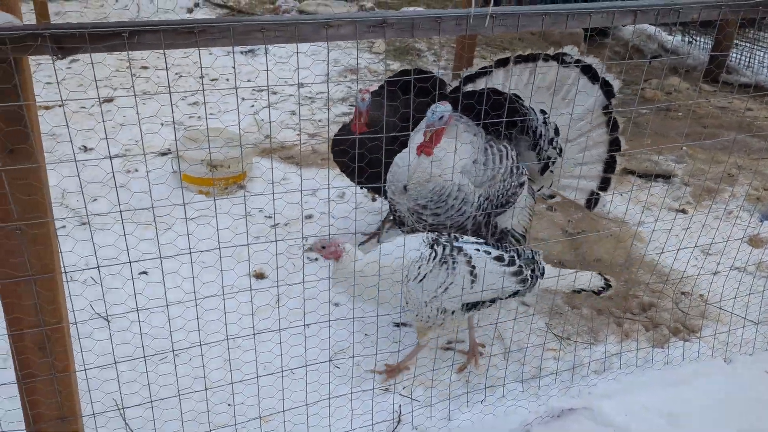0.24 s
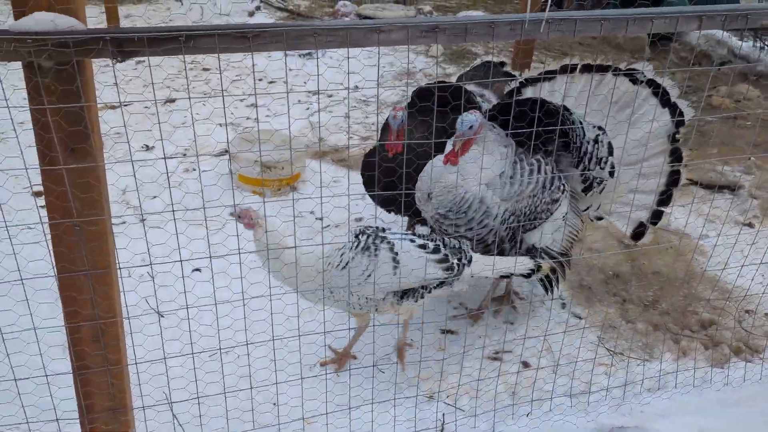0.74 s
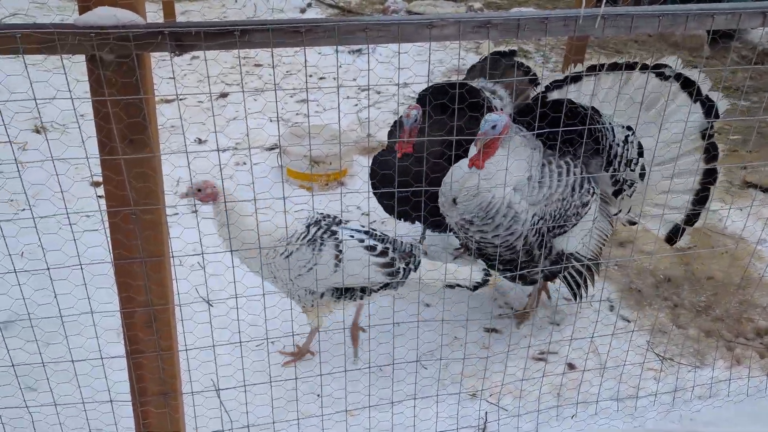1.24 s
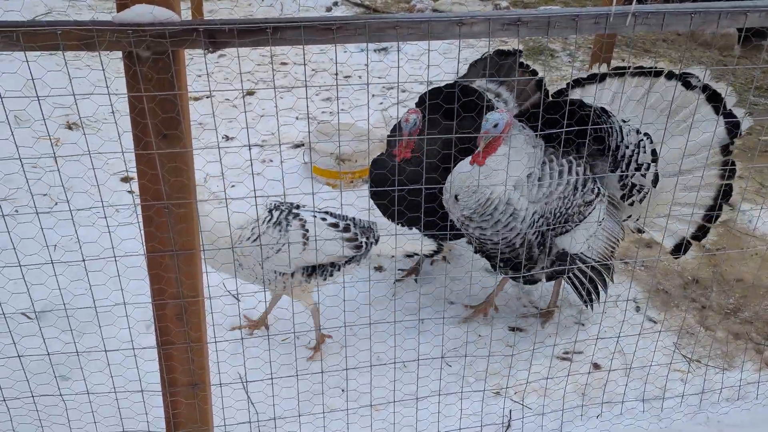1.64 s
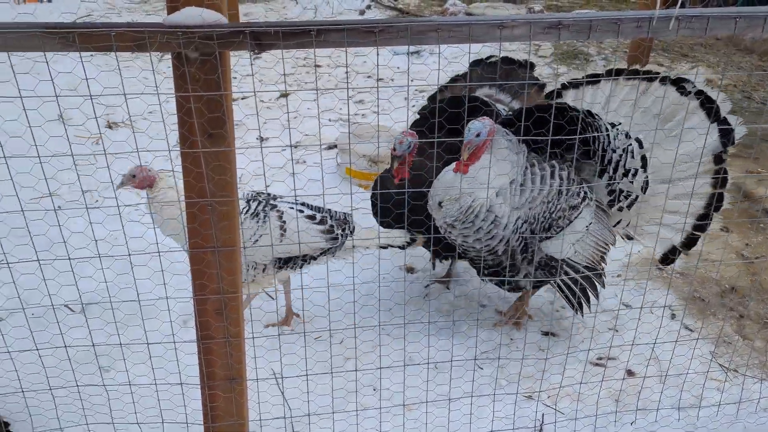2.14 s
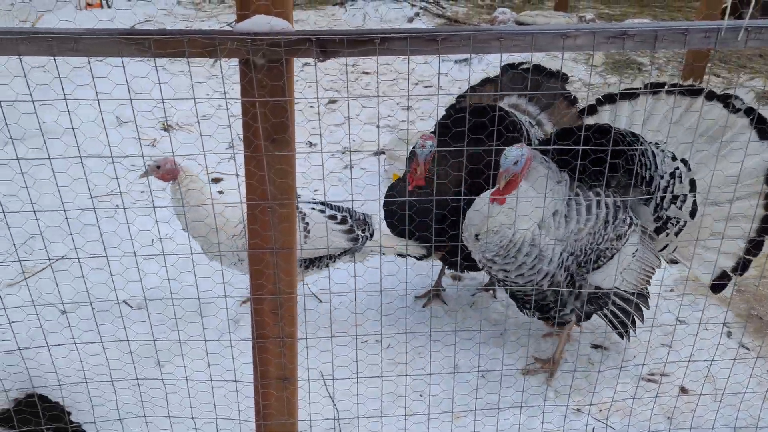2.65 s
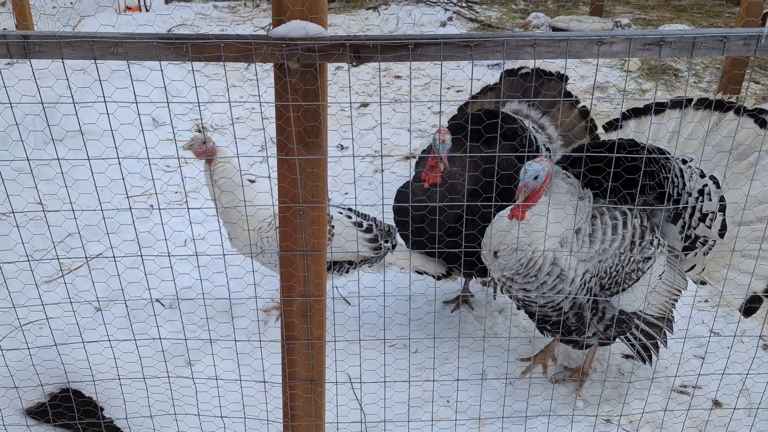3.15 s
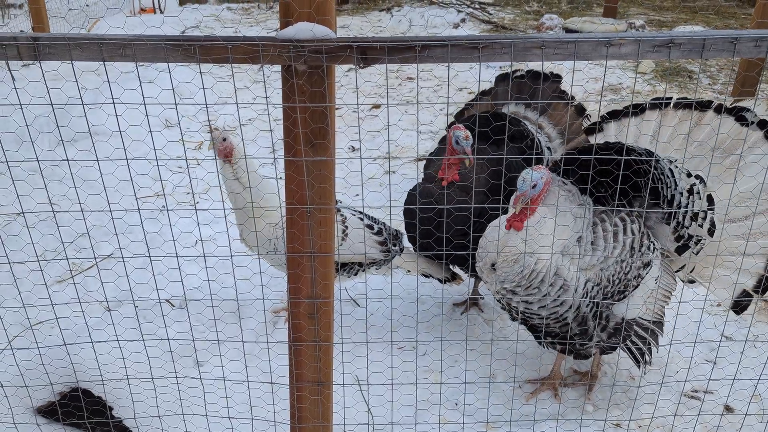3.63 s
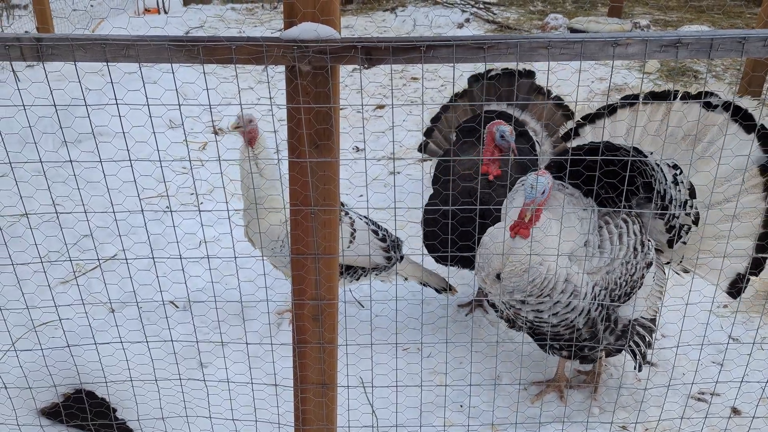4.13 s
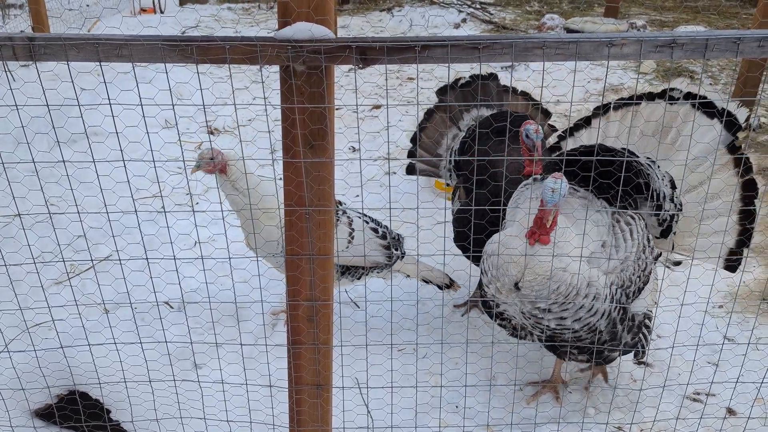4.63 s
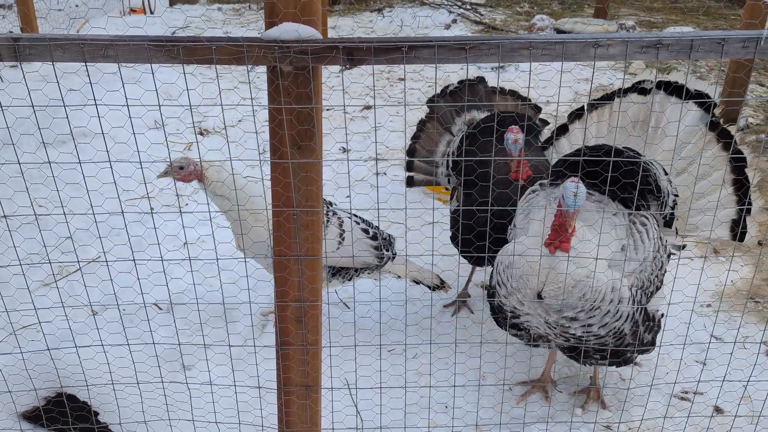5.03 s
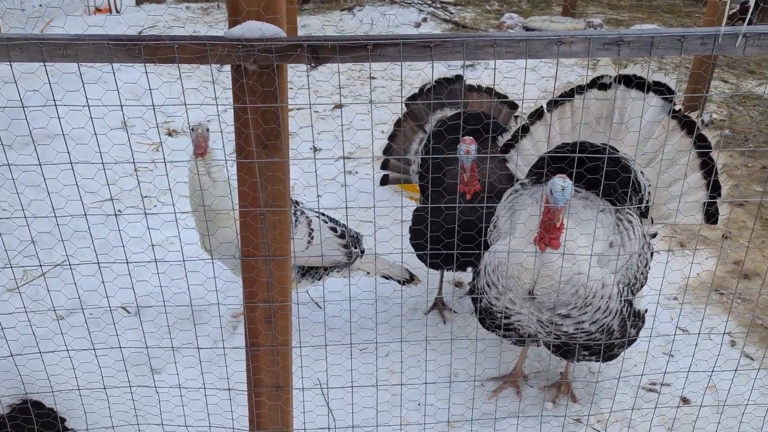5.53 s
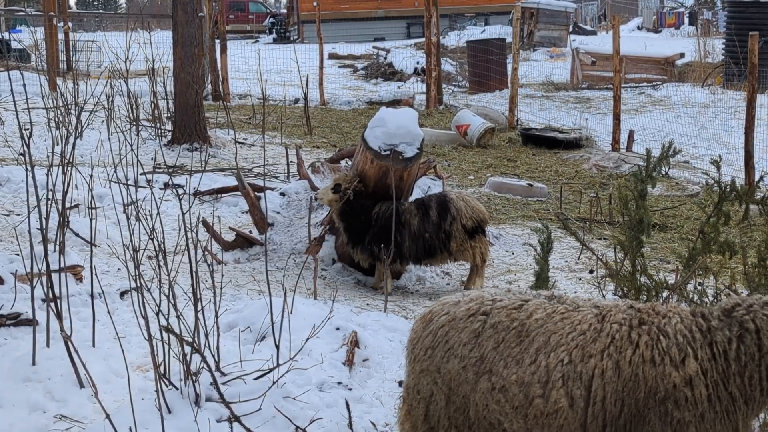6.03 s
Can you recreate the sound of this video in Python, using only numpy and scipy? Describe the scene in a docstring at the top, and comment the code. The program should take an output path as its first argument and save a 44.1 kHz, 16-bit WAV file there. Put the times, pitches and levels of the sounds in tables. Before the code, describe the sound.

Two male turkeys call nearby outdoors: the one ahead makes cracking yelps, thin squeaks and sagging, warbling whines; the one on the right drawls, then rattles in hard chirps and low croaks. Calls are brief clusters lasting under a second, separated by soft snow crunches, feather swishes and small dry ticks. A handheld stereo microphone catches little echo, faint open-air hiss and a steady distant motor hum; afterwards only quiet yard sound remains.

```python
"""Two turkeys gobble together in a snowy outdoor pen, one straight ahead and one off to the side.
The one ahead yelps, squeaks and whines; the other drawls into a rattle of chirps and low croaks.
Their notes are gliding sine tones with overtones; shaped noise adds hisses of air and rustling feet and feathers.
Small things tick as quickly fading swings, a distant motor hums in steady low tones,
and filtered noise makes the open air and a few far-off washes."""
import sys
import numpy as np
from scipy import signal
from scipy.fft import rfft, irfft, next_fast_len
from scipy.io import wavfile
from scipy.ndimage import uniform_filter1d

SR = 44100
rng = np.random.default_rng(int(sys.argv[2]) if len(sys.argv) > 2 else 0)


def bounce(signal):
    """Save signal as a 16-bit WAV file at the path given by the first command-line argument."""
    frames = np.transpose(np.atleast_2d(signal))
    limited = np.clip(frames, -1, 1)
    pcm = np.round(limited * 32767).astype(np.int16)
    wavfile.write(sys.argv[1], SR, pcm)


N = 276815
TIME = np.arange(N) / SR  # seconds

# yelps of the bird ahead: start_s, length_s, start_hz, rise_s, break_after_s, held_hz,
# rising_db, held_db, rising_brightness_db, held_second_harmonic_db
YELPS = [(1.072, .026, 796, 0.0057, 0.0083, 1110, -51.5, -46, -17, -15),
         (1.433, .031, 630, 0.0037, 0.01, 1588, -40, -37.5, -12.5, -19),
         (2.749, 0.026, 744, .007, .011, 1207, -43, -33, -10.5, -7.5),
         (3.077, 0.047, 584, 0.0075, .016, 1520, -36.5, -43.5, -5.5, -21),
         (4.63, 0.033, 620, 0.00413, .011, 1570, -34.5, -28.5, -11.5, -15.5)]
YELP_BREAK_HZ, YELP_ATTACK_S, YELP_RELEASE_S = 1230, 0.0026, 0.016
# falling whines of the bird ahead: start_s, length_s, pitch_hz, sag_octaves, warble_hz, warble_octaves,
# level_db, fade_db, second_harmonic_db, fall_per_further_overtone_db
WHINES = [(1.15, 0.1, 1046, .13, 41, .04, -45.5, 8, -14.5, 8),
          (1.245, 0.071, 999, 0.28, 45.7, .1, -47, 3.5, -9.5, 9),
          (1.313, 0.069, 726, 0.27, 42.3, .035, -51, 0.5, -9, 14),
          (1.509, 0.098, 1110, 0.19, 41.2, 0.049, -44.5, -2, -9.5, 8),
          (2.87, 0.065, 1078, 0.11, 29.8, .02, -49, -4, -7, 10),
          (3.186, .051, 1134, 0.33, 27.4, 0.057, -34.5, 4, -3.5, 5.5),
          (4.351, 0.12, 1055, 0.15, 45, 0.056, -44, 3, -11.5, -1),
          (4.462, .049, 990, 0.078, 46, 0.095, -43.5, 1, -9, 3),
          (4.505, 0.08, 863, 0.28, 47.4, .11, -45.5, 3, -10, 7),
          (4.732, 0.069, 1118, 0.084, 42, 0.054, -37, 3, -7.5, 10)]
WHINE_CREST_TURNS, WHINE_WARBLE_DB, WHINE_SAG_POWER = 0.37, 1, 2
WHINE_ATTACK_S, WHINE_RELEASE_S, COLLAPSE_S, COLLAPSE_OCTAVES = 0.0042, 0.016, 0.021, 1.09
BLOOM_DB, BLOOM_S = 8, 0.014  # overtones of a whine start this much weaker and grow over about this time
# thin squeaks of the bird ahead: start_s, length_s, from_hz, to_hz, level_db
SQUEAKS = [(1.131, 0.019, 1460, 1240, -52.5), (1.456, 0.027, 2100, 1690, -55.5),
           (3.112, 0.033, 1540, 1480, -53.5), (3.142, 0.034, 1536, 1255, -39),
           (3.172, 0.016, 1504, 1280, -35.5), (4.347, .011, 1230, 1120, -51),
           (4.665, 0.018, 1910, 1830, -63), (4.689, .012, 1500, 1850, -52), (4.698, 0.0203, 1770, 990, -43),
           (4.716, 0.016, 1590, 1170, -39)]
SQUEAK_SECOND_DB, GLIDE_EDGE_S, GLIDE_POWER = -23.5, 0.0042, 1.68
# drawn-out notes of the side bird: start_s, length_s, pitch_hz, scoop_octaves, warble_hz, warble_octaves,
# warble_db, level_db, swell_db, second_harmonic_db
DRAWLS = [(1.656, 0.081, 1109, 0.37, 18.5, 0.047, -1, -43, 1, -12.5),
          (2.82, 0.096, 840, 0, 19, 0.028, 4, -43.5, 3, 7.5),
          (2.924, 0.049, 957, 0, 48, 0.062, 1, -44, -2.5, 0),
          (4.148, .095, 1146, 0.417, 22.9, 0.062, 2.5, -39, 3.5, -14.5),
          (4.3, 0.017, 1140, 0, 48, 0.011, 1, -37, -3, -5)]
DRAWL_CREST_TURNS, SCOOP_S, DRAWL_ATTACK_S, DRAWL_RELEASE_S = 0.54, 0.0197, 0.0088, 0.0039
# rattle of the side bird, one upward chirp a row: leap_s, lead_in_s, low_hz, high_hz,
# before_db, after_db, brightness_db
CHIRPS = [(1.747, 0.012, 1336, 2150, -28.5, -42, -10), (1.7945, .013, 832, 2140, -31, -30.5, -6.5),
          (1.8423, .013, 803, 2270, -29.5, -29.5, -8), (1.8885, 0.0092, 1000, 2230, -29, -37.5, -6),
          (2.9247, 0.0085, 883, 1560, -35, -32, -21), (2.9765, .009, 812, 1680, -31.5, -32, -16),
          (4.2492, .009, 1340, 1930, -24.5, -42, -18), (4.2941, 0.011, 910, 1625, -32, -30.5, -16)]
CHIRP_LEAP_S, CHIRP_TAIL_S, CHIRP_RELEASE_S = 0.0037, 0.0099, 0.0056
CHIRP_ATTACK_SHARE, CHIRP_BLOOM_DB = 0.56, 11  # share of the lead-in spent swelling; overtone growth over it
# low croaks of the side bird: start_s, length_s, from_hz, to_hz, level_db, second_harmonic_db
CROAKS = [(2.979, 0.0239, 742, 450, -45.5, 7.5), (4.294, .013, 733, 740, -38.5, 0.5)]
# one faint far-off peep: start_s, length_s, from_hz, to_hz, level_db
PEEP = (5.745, .075, 2624, 2708, -70)
FALL_DB, DRAWL_FALL_DB, CHIRP_FALL_DB = 7, 13.5, 7.5  # fall per overtone: yelps and glides, drawls, chirps
EDGE_DB = 16  # every note rises from and dies to this far below its body

# throat resonances that colour the overtones: pitch_hz, gain_db
THROAT = [(1000, -2.5), (1700, 9), (2300, -0.5), (2650, -3), (3150, -9.5), (3600, -20), (4600, -33),
          (6000, -43), (9000, -54)]
# colour of the rough breath at a leap in pitch: pitch_hz, gain_db
RASP_COLOUR = [(400, -23), (900, -12), (1700, 8), (2700, -1), (3100, -30), (3900, -20), (4500, -12),
               (5200, -28), (9000, -32)]
RUSH_DB, SIDE_RUSH_DB = -17, -14  # that breath against the tone at a full leap: ahead, to the side
FRONT_ECHO_DB, SIDE_ECHO_DB = -17, -13  # scatter near each bird against its direct sound
# rush of air before a sharp note: peak_s, length_s, level_db
PUFFS = [(1.426, 0.023, -54), (3.067, 0.02, -44), (4.623, 0.02, -49)]
# colour of that rush: pitch_hz, gain_db
PUFF_COLOUR = [(800, -14), (1700, 4.5), (2800, -3.5), (4200, -16), (7000, -8), (9000, -16.5), (11500, -4),
               (13500, -19), (16000, -28)]

# scuffs of feet and feathers on snow: peak_s, length_s, crunch_db, swish_db
SCUFFS = [(0.058, 0.28, -63.5, -63), (0.68, 0.043, -60, -62.5), (1.292, 0.057, -62, -60),
          (1.61, 0.066, -64.5, -65), (1.901, 0.0069, -52, -53), (2.217, 0.028, -58, -61),
          (2.301, 0.079, -56, -65), (2.419, 0.034, -56.5, -65), (2.57, 0.12, -54, -61),
          (2.922, 0.077, -55, -59), (3.233, 0.055, -63, -62), (3.352, 0.062, -59, -65),
          (3.55, 0.14, -61.5, -72), (3.72, .06, -62, -76), (3.854, 0.023, -62, -69),
          (4.07, .06, -64.5, -81), (4.452, 0.033, -78, -61.5), (4.803, .08, -69, -59),
          (5.357, 0.054, -73, -66)]
# colour of the snow crunch: pitch_hz, gain_db
CRUNCH_COLOUR = [(500, -36), (1500, 5.5), (3200, 9), (5000, -1), (8000, -14), (16000, -44)]
# colour of the feather swish: pitch_hz, gain_db
SWISH_COLOUR = [(3000, -23), (7000, -9), (10000, -5), (12500, 0.5), (16000, -4.5)]
# small dry ticks: start_s, level_db, centre_hz, rattle_fade_by_60_db_s
TICKS = [(0.0963, -39.5, 890, 0.028), (0.1061, -44.5, 800, 0.027), (.476, -60, 4000, 0.02),
         (2.132, -44.5, 1153, 0.014), (4.858, -55, 2460, .025), (6.035, -45.5, 1400, 0.016)]
# one faint metallic tink: pitch_hz, level_db, fade_by_60_db_s
TINK_S, TINK_MODES = 6.128, [(7370, -64, .15), (10080, -64.5, 0.14)]

# motor tones, before the slow waver and overall level: pitch_hz, level_db, waver_depth_db
HUM = [(58.5, -64, 2), (86.2, -68, 0.5), (91.1, -53, 2), (119.7, -54.5, 1.76), (155.9, -65.5, 1.5),
       (199, -67, 2), (360, -62, 6)]
# overall rise and fall of the hum: time_s, gain_db
HUM_LEVEL = [(0, 3), (.5, 4), (1.3, 0), (2, 2.5), (3.2, -0.5), (4.1, 2), (4.6, -3.5), (5.4, 0), (6.28, -3)]
# open air spectrum: pitch_hz, relative_level_db
AIR = [(20, -15.5), (45, -21.5), (75, 0.5), (140, -13.5), (300, -6), (420, -6.5), (650, -13.5), (1200, -19),
       (3000, -28.5), (4000, -35), (6500, -38.5), (8100, -37), (9000, -41), (10200, -42), (12300, -36),
       (15700, -48.5)]
AIR_DB = -51  # before the three ranges get their own levels
# how alike the air is at left and right: pitch_hz, correlation (1 same, 0 unrelated, -1 opposite)
AIR_LIKENESS = [(60, 1), (130, 0.87), (290, 0.94), (640, 0.25), (1400, -0.41), (3000, -0.073),
                (15000, 0.026)]
# level of the air's rumble: time_s, gain_db
RUMBLE_LEVEL = [(0, -3.5), (1, -2), (3.4, 2), (5.5, 2.4), (5.8, -0.8)]
# level of the air's treble: time_s, gain_db
TREBLE_LEVEL = [(0, 12), (.5, 3), (1.2, 3), (2.6, 7), (3.4, 2.5), (4.3, 3), (5.8, 1)]
MIDDLE_SHARE, MIDDLE_DB = 0.37, -2.2  # the middle range follows the treble by this share
# far-off washes of noise: peak_s, length_s, centre_hz, level_db
WASHES = [(0.04, 0.5, 1260, -57), (5.29, 0.75, 450, -55.5), (5.98, 0.56, 763, -56.5)]
# treble and bass colour of the two microphone ports: pitch_hz, left_db, right_db
PORTS = [(103, 0.5, 2), (400, 0.36, 0.5), (1250, 0.5, 2), (2120, 4, 1.5), (3770, 1, -1.5), (8260, 1, 3.5),
         (9950, 0, 0.5), (12500, 2.5, -11.5), (14800, -0.5, -5.5)]
TOP_HZ = 15750  # sound above this is cut


def undb(db):
    """Turn decibels into a plain multiplier."""
    return 10 ** (np.asarray(db) / 20)


def on_log_axis(hz, points):
    """Read a curve of (Hz, value) points at any frequency, evenly spaced by octave."""
    f, value = np.transpose(points)
    return np.interp(np.log(np.maximum(hz, 1)), np.log(f), value)


def over_time(points):
    """Join (seconds, value) points with straight lines over the whole scene."""
    return np.interp(TIME, *np.transpose(points))


def colour(x, points):
    """Make each frequency louder or softer by a (Hz, dB) curve."""
    n = x.shape[-1]
    return irfft(rfft(x) * undb(on_log_axis(np.fft.rfftfreq(n, 1 / SR), points)), n)


def noise(points, channels=2):
    """Coloured noise with an average strength (rms) of 1, unrelated in each channel."""
    white = rng.standard_normal((channels, next_fast_len(N, True)))
    x = colour(white, points)[:, :N]
    return x / x.std()


def walk(rate):
    """Smooth random wandering with a spread near 1, taking about rate new values a second."""
    k = max(int(SR / rate), 2)
    steps = np.repeat(rng.standard_normal(N // k + 1), k)
    return 1.047 * uniform_filter1d(steps, k)[:N]


def swell(s, length):
    """A bell-shaped rise and fall around its peak."""
    return np.exp(-2 * ((TIME - s) / length) ** 2)


def turkeys():
    """Both birds and a far peep sing through the same voice model; noise rushes before the sharp notes."""
    front_notes = [yelp(*row) for row in YELPS]
    front_notes += [whine(*row) for row in WHINES]
    front_notes += [glide(*row) for row in SQUEAKS]
    side_notes = [drawl(*row) for row in DRAWLS]
    side_notes += [chirp(*row) for row in CHIRPS]
    side_notes += [glide(*row) for row in CROAKS]
    front = syrinx(front_notes, jitter=0.0091, shimmer_db=0.5, rasp_db=-14.5, husk_db=-28,
                   rush_db=RUSH_DB, fade_s=0.00311)
    side = syrinx(side_notes, jitter=0.013, shimmer_db=1.6, rasp_db=-11.0, husk_db=-23,
                  rush_db=SIDE_RUSH_DB, fade_s=0.00304)
    far = syrinx([glide(*PEEP)], jitter=0.017, shimmer_db=6.0, rasp_db=-20, husk_db=-10,
                 rush_db=RUSH_DB, fade_s=0.0043)
    front = place(undb(2.5) * front, lag_ms=0.045, right_db=2.0,
                  echo_db=FRONT_ECHO_DB, echo_t60=0.11, tail_db=-20.5, tail_t60=0.34)
    side = place(undb(3.0) * side, lag_ms=0.25, right_db=5.5,
                 echo_db=SIDE_ECHO_DB, echo_t60=0.074, tail_db=-20.5, tail_t60=0.99)
    return front + side + far + puffs()


def syrinx(notes, jitter, shimmer_db, rasp_db, husk_db, rush_db, fade_s):
    """A membrane tone with throat-coloured overtones; always a little husky, harsh where the pitch leaps."""
    out = np.zeros(N)
    waver, flutter, grit = walk(500), walk(300), walk(1100)
    rush = noise(RASP_COLOUR, channels=1)[0]
    for s, pitch, level, second, fall_db in notes:
        first, last = int((s[0] - fade_s / 2) * SR), int((s[-1] + fade_s / 2) * SR)
        i = np.arange(first, last)
        # a short average rounds off sudden steps
        hz, db, second_db = (uniform_filter1d(np.interp(TIME[i], s, curve), size=66)
                             for curve in (pitch, level, second))
        octaves_per_s = np.abs(np.gradient(np.log2(hz))) * SR
        leap = np.clip(octaves_per_s / 90, 0, 1)
        phase = 2 * np.pi * np.cumsum(hz * (1 + jitter * waver[i])) / SR
        tone = np.sin(phase)
        for k in range(2, 8):
            # higher overtones follow the second one, falling away through the throat's resonances
            throat_db = on_log_axis(k * hz, THROAT) - on_log_axis(2 * hz, THROAT)
            overtone_db = second_db + throat_db - fall_db * (k - 2)
            tone += undb(overtone_db) * np.sin(k * phase)
        tone += undb(rush_db) * leap * rush[i]
        edge = np.clip(np.minimum(i - i[0], i[-1] - i) / SR / fade_s, 0, 1)
        roughness = undb(husk_db) + undb(rasp_db) * leap
        loudness = undb(db + shimmer_db * flutter[i])
        out[i] += tone * edge * loudness * (1 + roughness * grit[i])
    return out


def yelp(s, length, start_hz, rise_s, break_s, held_hz, rise_db, held_db, bright_db, held_second_db):
    """The pitch shoots up, then breaks to a held note that dies away."""
    age = TIME[TIME < length]
    rising = age < break_s
    top_hz = min(held_hz, YELP_BREAK_HZ)
    rising_hz = top_hz + (start_hz - top_hz) * np.exp(-(age / rise_s) ** 2)
    hz = np.where(rising, rising_hz, held_hz)
    db = np.where(rising, rise_db, held_db) + edges(age, YELP_ATTACK_S, YELP_RELEASE_S)
    second_db = np.where(rising, bright_db + throat_lift(hz), held_second_db)
    return s + age, hz, db, second_db, FALL_DB


def whine(s, length, hz, sag, warble_hz, depth, db, fade_db, second_db, fall_db):
    """A warbling note, lifted in level on each crest, that sags and finally collapses in pitch."""
    age = TIME[TIME < length]
    warble = np.cos(2 * np.pi * (warble_hz * age - WHINE_CREST_TURNS))
    collapse = np.maximum(1 - (length - age) / COLLAPSE_S, 0) ** 2
    sagging = sag * (age / length) ** WHINE_SAG_POWER
    octaves = depth * warble - sagging - COLLAPSE_OCTAVES * collapse
    level = db - fade_db * age / length + WHINE_WARBLE_DB * warble
    level += edges(age, WHINE_ATTACK_S, WHINE_RELEASE_S)
    blooming_db = second_db - BLOOM_DB * np.exp(-age / BLOOM_S)
    return s + age, hz * 2 ** octaves, level, blooming_db, fall_db


def glide(s, length, from_hz, to_hz, db, second_db=SQUEAK_SECOND_DB):
    """A squeak, croak or peep: one short slide in pitch that gathers speed."""
    age = TIME[TIME < length]
    hz = from_hz * (to_hz / from_hz) ** ((age / length) ** GLIDE_POWER)
    level = db + edges(age, GLIDE_EDGE_S, GLIDE_EDGE_S)
    return s + age, hz, level, np.full(len(age), second_db), FALL_DB


def drawl(s, length, hz, scoop, warble_hz, depth, warble_db, db, swell_db, second_db):
    """A warbling note that may scoop up to its pitch, and swells or fades along the way."""
    age = TIME[TIME < length]
    warble = np.cos(2 * np.pi * (warble_hz * age - DRAWL_CREST_TURNS))
    octaves = depth * warble - scoop * np.maximum(1 - age / SCOOP_S, 0)
    level = db + swell_db * age / length + warble_db * warble
    level += edges(age, DRAWL_ATTACK_S, DRAWL_RELEASE_S)
    return s + age, hz * 2 ** octaves, level, np.full(len(age), second_db), DRAWL_FALL_DB


def chirp(s, lead_s, low_hz, high_hz, low_db, high_db, bright_db):
    """One beat of the rattle: a low note swells, brightens and flips into the high register."""
    age = TIME[TIME < lead_s + CHIRP_TAIL_S]
    flip = (1 + np.tanh((age - lead_s) / CHIRP_LEAP_S)) / 2  # from 0 (low) to 1 (high)
    hz = low_hz * (high_hz / low_hz) ** flip
    db = low_db + (high_db - low_db) * flip + edges(age, CHIRP_ATTACK_SHARE * lead_s, CHIRP_RELEASE_S)
    bloom_db = CHIRP_BLOOM_DB * np.maximum(1 - age / lead_s, 0)
    second_db = bright_db + throat_lift(hz) - bloom_db
    return s - lead_s + age, hz, db, second_db, CHIRP_FALL_DB


def edges(age, attack_s, release_s):
    """How far a note lies below its body as it starts and ends, in dB."""
    attack = np.maximum(1 - age / attack_s, 0)
    release = np.maximum(1 - (age[-1] - age) / release_s, 0)
    return -EDGE_DB * (attack + release)


def throat_lift(hz):
    """How much the throat favours the second harmonic over the base pitch, in dB."""
    return on_log_axis(2 * hz, THROAT) - on_log_axis(hz, THROAT)


def puffs():
    """Air rushes out just before a sharp note: coloured noise in short swells."""
    level = sum(undb(db) * swell(s, length) for s, length, db in PUFFS)
    return noise(PUFF_COLOUR) * level


def place(x, lag_ms, right_db, echo_db, echo_t60, tail_db, tail_t60):
    """Direct sound reaches the right port late; posts and ground scatter it briefly, the yard a little longer."""
    t = TIME[:SR // 2]
    # each t60 is the time in seconds to fade by 60 dB
    echo = undb(echo_db - 60 * t / echo_t60) / np.sqrt(echo_t60)
    tail = undb(tail_db - 60 * t / tail_t60) / np.sqrt(tail_t60)
    decay = (echo + tail) * (t > 0.003)  # scatter starts after 3 ms
    scatter = rng.standard_normal((2, len(t))) * decay * np.sqrt(np.log(10 ** 6) / SR)
    left = x * undb(-right_db / 2)
    right = np.interp(TIME - lag_ms / 1000, TIME, x) * undb(right_db / 2)
    return np.array([left, right]) + signal.fftconvolve(x[None], scatter, axes=1)[:, :N]


def scuffs(grain_db=3.0, patchy_db=4.0):
    """Crunch of snow that gives way in small uneven bursts, with the thin swish of feathers above it."""
    crunch = sum(undb(db) * swell(s, length) for s, length, db, _ in SCUFFS)
    swish = sum(undb(db) * swell(s, length) for s, length, _, db in SCUFFS)
    unevenness = undb(grain_db * walk(600) + patchy_db * walk(70) - 2.5)
    return (crunch * noise(CRUNCH_COLOUR) + swish * noise(SWISH_COLOUR)) * unevenness


def ticks(rattle_db=-7, damping=2.2):
    """Knocks: one heavily damped swing and a short rattle; then one thin ring of metal."""
    out = np.zeros(N)
    for s, db, hz, t60 in TICKS:
        age = np.maximum(TIME - s, 0)
        swing = 4 * np.sin(2 * np.pi * hz * age) * np.exp(-damping * hz * age)
        rattle_colour = [(hz / 6, -18), (hz, 0), (hz * 1.9, -4), (hz * 8, -40)]
        rattle = noise(rattle_colour, channels=1)[0] * (age > 0)
        out += undb(db) * (swing + rattle * undb(rattle_db - 60 * age / t60))
    age = np.maximum(TIME - TINK_S, 0)
    for hz, db, t60 in TINK_MODES:
        out += undb(db - 60 * age / t60) * np.sin(2 * np.pi * hz * age)
    return out


def hum(drift_hz=0.55, waver_hz=9.0):
    """Low motor tones that waver in pitch and level and beat against each other."""
    out = np.zeros(N)
    for hz, db, depth in HUM:
        level = undb(db + depth * (walk(waver_hz) - 1.67))
        phase = 2 * np.pi * np.cumsum(hz + drift_hz * walk(6)) / SR
        out += level * np.sqrt(2) * np.sin(phase)
    return out * undb(over_time(HUM_LEVEL))


def air(flicker_db=1.45):
    """Outdoor rumble and hiss: alike at both ports in the bass, diffuse above; three ranges flicker apart."""
    n = next_fast_len(N, True)
    hz = np.fft.rfftfreq(n, 1 / SR)
    likeness = np.clip(on_log_axis(hz, AIR_LIKENESS), -0.99, 0.99)
    mid, side = rfft(rng.standard_normal((2, n))) * undb(on_log_axis(hz, AIR))
    # the side part has opposite signs at left and right
    both = mid * np.sqrt(1 + likeness) + side * np.sqrt(1 - likeness) * np.array([[1], [-1]])
    both *= undb(AIR_DB) / irfft(both, n).std()
    low = on_log_axis(hz, [(450, 0.74), (800, 0.012)])
    treble = on_log_axis(hz, [(2500, 0.05), (5000, 0.73)])
    middle = 1 - low - treble
    rumble_db, treble_db = over_time(RUMBLE_LEVEL), over_time(TREBLE_LEVEL)
    middle_db = MIDDLE_DB + MIDDLE_SHARE * treble_db
    ranges = [(low, rumble_db), (middle, middle_db), (treble, treble_db)]
    return sum(irfft(both * share, n)[:, :N] * undb(db + flicker_db * walk(14)) for share, db in ranges)


def washes():
    """Soft distant noise that swells and fades in one broad band."""
    out = np.zeros((1, N))
    for s, length, hz, db in WASHES:
        band = [(hz / 3, -24), (hz * 0.73, -2), (hz, 0), (hz * 1.46, -5), (hz * 4, -36), (hz * 10, -70)]
        out += noise(band, channels=1) * undb(db) * swell(s, length)
    return out


def scene():
    """The pen: birds, scuffs, ticks, motor, air and washes together."""
    return turkeys() + scuffs() + ticks() + hum() + air() + washes()


def record(dry):
    """Each port adds its own colour; the top is cut steeply."""
    left = colour(dry[0], [(hz, left_db) for hz, left_db, _ in PORTS])
    right = colour(dry[1], [(hz, right_db) for hz, _, right_db in PORTS])
    steep_cut = signal.ellip(10, 0.2, 70, TOP_HZ, fs=SR, output="sos")
    return signal.sosfilt(steep_cut, np.array([left, right]))


dry = scene()
out = record(dry)
bounce(out)
```